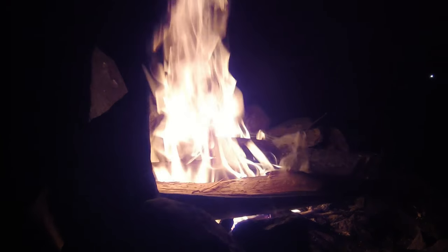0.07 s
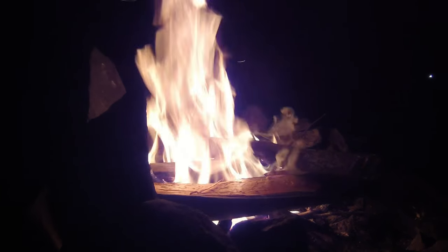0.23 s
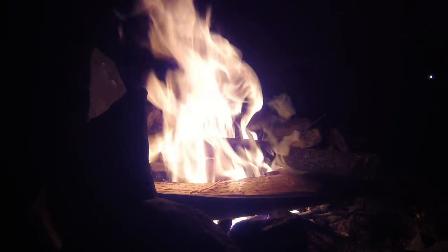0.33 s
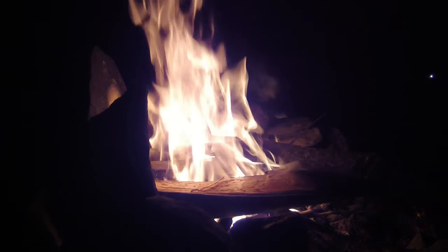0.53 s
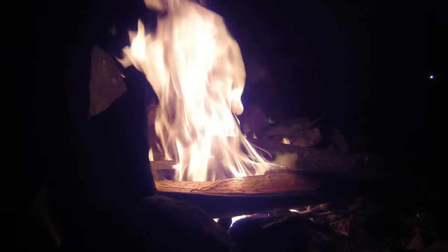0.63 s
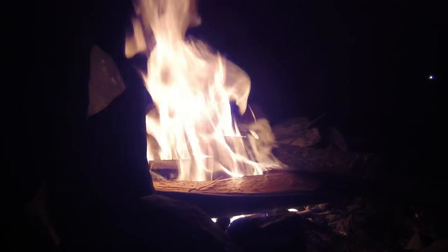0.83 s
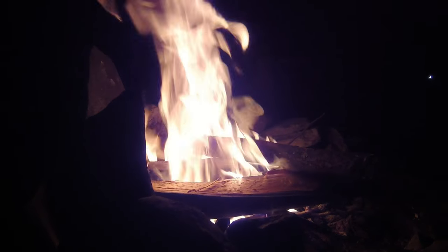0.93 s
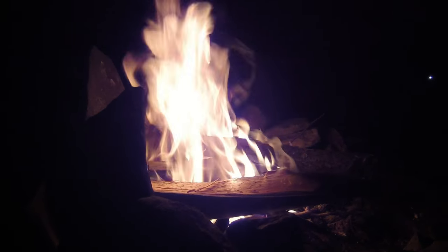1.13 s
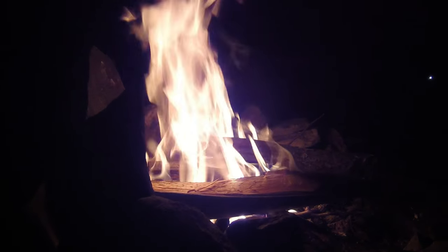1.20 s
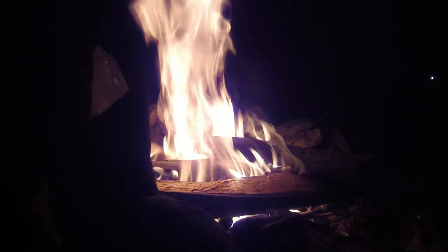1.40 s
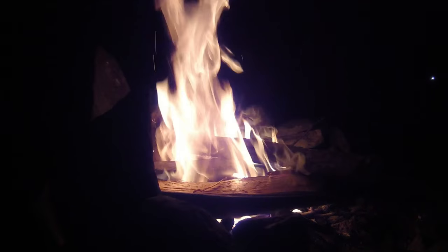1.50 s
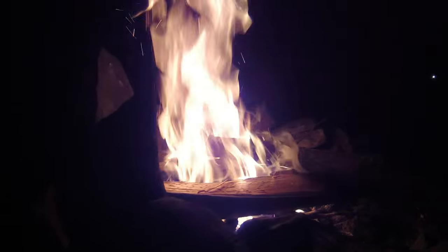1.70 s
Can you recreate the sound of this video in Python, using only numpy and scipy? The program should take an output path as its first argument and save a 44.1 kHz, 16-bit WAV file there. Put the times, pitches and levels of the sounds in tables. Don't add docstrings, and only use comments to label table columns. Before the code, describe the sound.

Close campfire burning at night, scattered small ticks and two hard snapping pops, faint flame roar

```python
import sys
import numpy as np
from scipy import signal
from scipy.fft import rfft, irfft, next_fast_len
from scipy.io import wavfile
from scipy.ndimage import uniform_filter1d, map_coordinates

SR = 44100
rng = np.random.default_rng(int(sys.argv[2]) if len(sys.argv) > 2 else 0)


def put_to_file(sound):
    columns = np.atleast_2d(sound).T
    safe = np.clip(columns, -1, 1)
    whole_steps = np.round(safe * 32767)
    wavfile.write(sys.argv[1], SR, whole_steps.astype(np.int16))


def magnitude_from_level(level_db):
    exponent = np.asarray(level_db, float) / 20
    return 10 ** exponent


N = 77175


def unit(x):
    return x / np.sqrt(np.mean(x ** 2) + 1e-20)


def along(points, hz):
    point_hz, value = np.transpose(points)
    return np.interp(np.log(hz + 1), np.log(point_hz + 1), value)


def wobble(rate_hz):
    knots = rng.standard_normal(int(N * rate_hz / SR) + 4)
    return map_coordinates(knots, [np.arange(N) * rate_hz / SR])


def filtered(x, response):
    length = x.shape[-1]
    size = next_fast_len(length + 8192)
    spectrum = rfft(x, size) * response(np.fft.rfftfreq(size, 1 / SR))
    return irfft(spectrum, size)[..., :length]


def patchy(patchy_db):
    cells = signal.stft(rng.standard_normal(N + 512), nperseg=512)[2]
    field = uniform_filter1d(rng.standard_normal(cells.shape), size=6, axis=0)
    field = uniform_filter1d(field, size=10, axis=1)
    return signal.istft(cells * magnitude_from_level(patchy_db * unit(field)), nperseg=512)[1][:N]


def add(out, start_s, x):
    part = out[round(start_s * SR):][:len(x)]
    part += x[:len(part)]


def bursts(rows, spatter_db):
    spatter_t60_s = 0.0042
    echo_db, echo_t60_s, echo_top_hz = -27, 0.03, 6500
    out, t = np.zeros(N), np.arange(SR // 10) / SR
    noise = rng.standard_normal((len(rows), 2, len(t)))
    noise[:, 1] = filtered(noise[:, 1], lambda hz: 1 / (1 + (hz / echo_top_hz) ** 4))
    for (start_s, peak_db, low_hz, top_hz), (tearing, scatter) in zip(rows, noise):
        spatter = magnitude_from_level(spatter_db - 60 * t / spatter_t60_s) * tearing
        echo = magnitude_from_level(echo_db - 60 * t / echo_t60_s) * scatter
        burst = spatter + echo
        burst[0] = 1
        low_pass = signal.butter(8, min(top_hz, SR * .45), fs=SR, output="sos")
        high_pass = signal.butter(2, low_hz, "high", fs=SR, output="sos")
        band = np.vstack([low_pass, high_pass])
        add(out, start_s, magnitude_from_level(peak_db) * signal.sosfilt(band, burst))
    return out


def sap_pops():
    # start_s, peak_db, low_hz, top_hz
    pockets = [(.2835, -8.5, 1190, 6500), (.28405, 1.5, 400, 4560), (.2845, -24, 1500, 6240),
               (.2853, -10.5, 1770, 5430), (.2857, -12, 2500, 6500), (.2961, -19, 6960, 11900),
               (.2962, -7, 800, 4180), (1.4773, -5.5, 1490, 10900), (1.4777, -6, 1730, 5200),
               (1.4782, -5.5, 3000, 10250), (1.4799, -16, 2000, 8000)]
    return bursts(pockets, spatter_db=-17)


def log_knocks():
    # start_s, level_db, pitch_hz, t60_s, first_swing (+1 out, -1 in)
    modes = [
        (.2840, -24.5, 700, 0.022, 1),
        (0.2856, -18, 279, 0.02, 1),
        (0.2875, -17, 81, 0.044, -1),
        (.2881, -15, 269, 0.021, -1),
        (0.2956, -15, 6330, 0.0033, 1),
        (1.4008, -34.5, 650, 0.0071, 1),
        (1.4772, -11.5, 738, .011, 1),
        (1.4779, -9.5, 5480, 0.0023, 1),
        (1.4781, -18, 267, 0.011, -1),
        (1.5135, -32.5, 660, 0.0069, 1),
    ]
    rise_s = 0.00023
    out, t = np.zeros(N), np.arange(SR // 8) / SR
    for start_s, level_db, pitch_hz, t60_s, first_swing in modes:
        envelope = magnitude_from_level(level_db - 60 * t / t60_s) * (1 - np.exp(-t / rise_s))
        add(out, start_s, np.sign(first_swing) * envelope * np.sin(2 * np.pi * pitch_hz * t))
    return out


def steam():
    # pitch_hz, density_db (dB per Hz)
    jet_spectrum = [(100, -120), (250, 16), (600, 1), (1500, -7.5), (4000, -8.5), (7500, -3), (9500, -14.5),
                    (13500, -17)]
    start_s, level_db = .2317, -47.5
    hold_s, t60_s = 0.0092, 0.0091
    after_db, after_t60_s = -5.5, 0.33
    t = np.arange(N) / SR - start_s
    after = np.maximum(t - hold_s, 0)
    shape = (t > 0) * (magnitude_from_level(-60 * after / t60_s) + magnitude_from_level(after_db - 60 * after / after_t60_s))
    jet = unit(filtered(rng.standard_normal(N), lambda hz: magnitude_from_level(along(jet_spectrum, hz))))
    return magnitude_from_level(level_db + 2.0 * wobble(400)) * shape * jet


def ticks():
    # start_s, peak_db, low_hz, top_hz
    snaps = [(.0512, -38, 2970, 10100), (.0597, -29.5, 3030, 6500), (.0775, -48, 4900, 7900),
             (.1350, -31.5, 4500, 7500), (.2978, -20, 4500, 8000), (.3287, -30, 1480, 6960),
             (.5292, -33, 4470, 7200), (.752, -32, 1500, 3000), (.8689, -33, 4000, 6500),
             (.8869, -30.5, 2000, 8400), (.8870, -40, 8500, 13800), (1.108, -43.5, 2000, 4500),
             (1.1666, -24, 2270, 7200), (1.1667, -39, 8100, 13400), (1.2615, -32, 4500, 7900),
             (1.3329, -37, 3500, 11500), (1.3905, -39, 4000, 7000), (1.4012, -21.5, 1260, 7250),
             (1.5135, -27.5, 2500, 6500), (1.5519, -27.5, 1500, 3430), (1.5522, -37, 4500, 7000)]
    return bursts(snaps, spatter_db=-13)


def flames():
    # pitch_hz, density_db (dB per Hz)
    roar_spectrum = [(12, -120), (20, -4.5), (45, 1), (100, -8.5), (230, -15.5), (420, -27), (900, -34.5),
                     (2000, -51)]
    # pitch_hz, density_db (dB per Hz)
    hiss_spectrum = [(100, -120), (300, 4.5), (1000, -0.5), (2500, -5.5), (4200, -10), (7000, -9),
                     (11000, -19), (14500, -28.5)]
    # time_s, level_db
    draught = [(0, 4.5), (.09, -2.5), (0.171, 2.5), (0.231, 3.5), (.3, 9), (.37, -4), (.48, 1.5), (.6, 1),
               (.7, -3), (.78, -4), (.9, 3.5), (1.0, 3.5), (1.15, 1), (1.3, 3.5), (1.42, 2), (1.55, 1.5),
               (1.63, 1.5), (1.75, -1)]
    # time_s, gain_db
    gain_steps = [(0, -2), (.3, 1), (.42, 0), (1.3, -2), (1.436, 1), (1.445, -8.5), (1.5, -4.5), (1.54, -6),
                  (1.75, -7.5)]
    roar_db, roar_swell_db, hiss_db = -47, 3.5, -63.5
    fizz_db, fizz_per_s, fizz_spread_db = -14, 600, 2
    t = np.arange(N) / SR

    roar = unit(filtered(rng.standard_normal(N), lambda hz: magnitude_from_level(along(roar_spectrum, hz))))
    draught_db = np.interp(t, *np.transpose(draught))
    roar = roar * magnitude_from_level(roar_swell_db * wobble(14.02) + draught_db)

    chance = rng.random((2, N))
    crack_size = magnitude_from_level(-fizz_spread_db * np.log(chance[1] + 1e-3))
    cracks = (chance[0] < fizz_per_s / SR) * crack_size
    gas = unit(patchy(patchy_db=0.76)) + magnitude_from_level(fizz_db) * unit(cracks)
    hiss = unit(filtered(gas, lambda hz: magnitude_from_level(along(hiss_spectrum, hz))))
    hiss = hiss * magnitude_from_level(0.39 * wobble(7.22))

    gain_db = np.interp(t, *np.transpose(gain_steps))
    return magnitude_from_level(gain_db) * (magnitude_from_level(roar_db) * roar + magnitude_from_level(hiss_db) * hiss)


def scene():
    fire = flames() + sap_pops() + ticks() + log_knocks() + steam()
    return fire[None]


def roll_off(x):
    return signal.sosfilt(signal.butter(12, 15200, fs=SR, output="sos"), x)


def record(dry):
    # centre_hz, width_hz, level_db (over flat)
    port_modes = [(2470, 1330, -2.5), (5200, 486, 7.5), (6500, 750, 11), (7620, 2200, 3)]
    top_hz = 13800

    def response(hz):
        port = 1
        for centre_hz, width_hz, level_db in port_modes:
            damping = 1j * hz * width_hz
            port = port + magnitude_from_level(level_db) * damping / (centre_hz * centre_hz - hz * hz + damping)
        return port / np.sqrt(1 + (hz / top_hz) ** 70)

    heard = filtered(dry, response)
    return roll_off(heard)


dry = scene()
out = record(dry)
put_to_file(out)
```